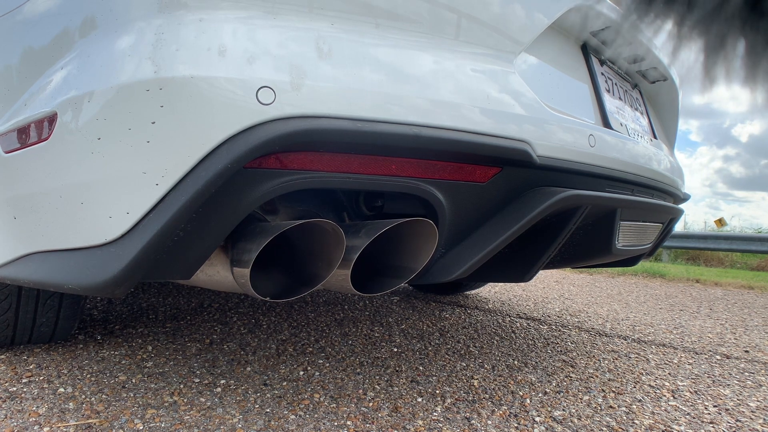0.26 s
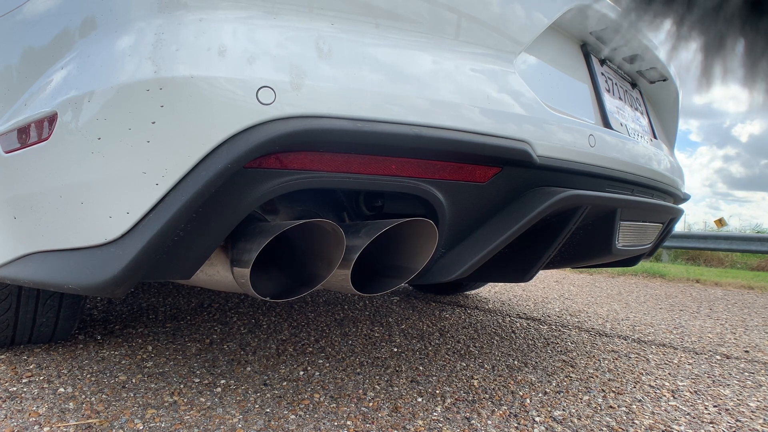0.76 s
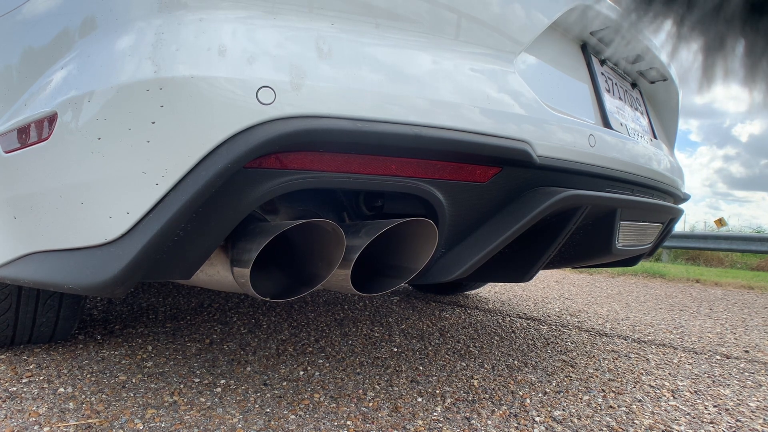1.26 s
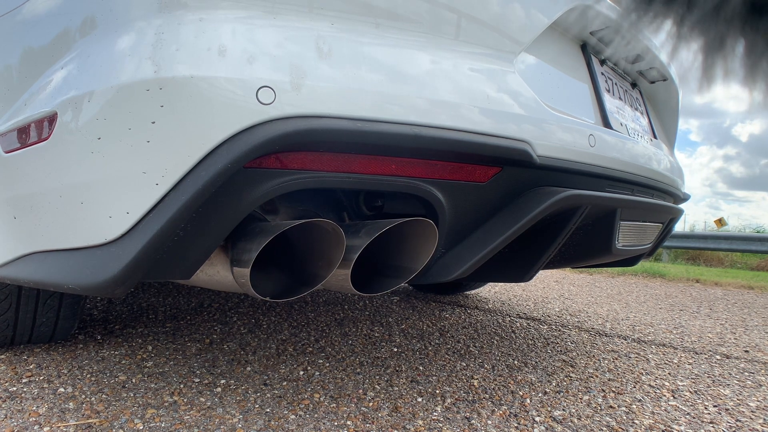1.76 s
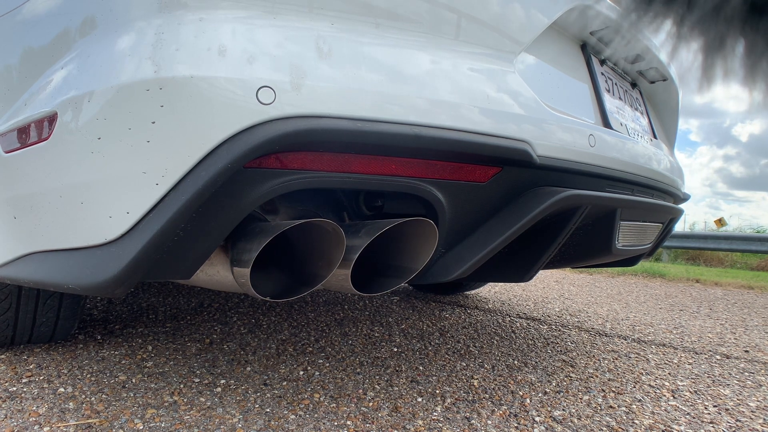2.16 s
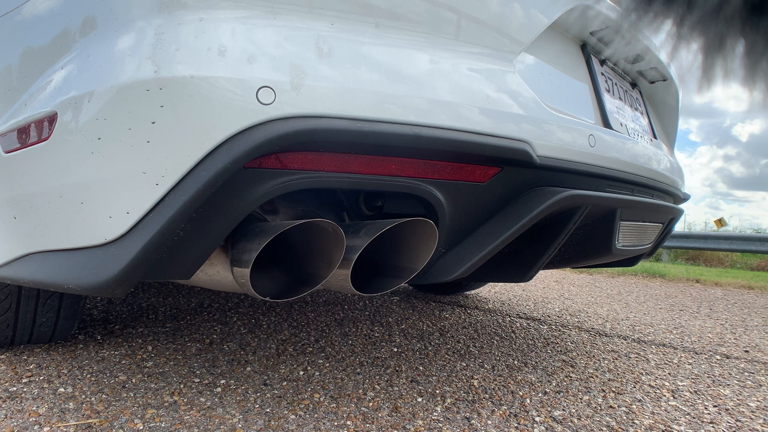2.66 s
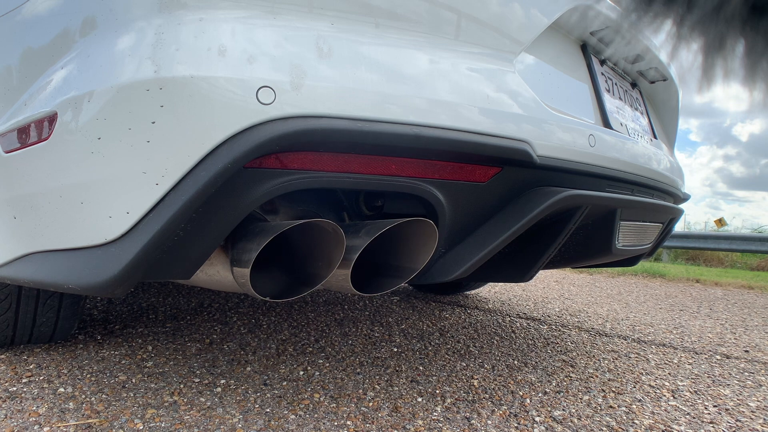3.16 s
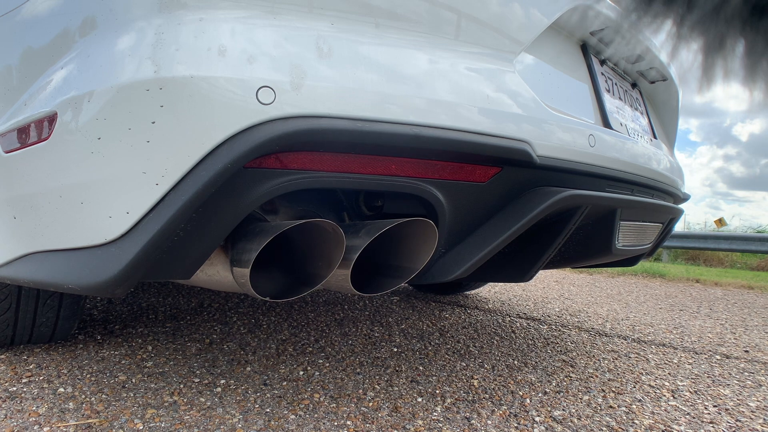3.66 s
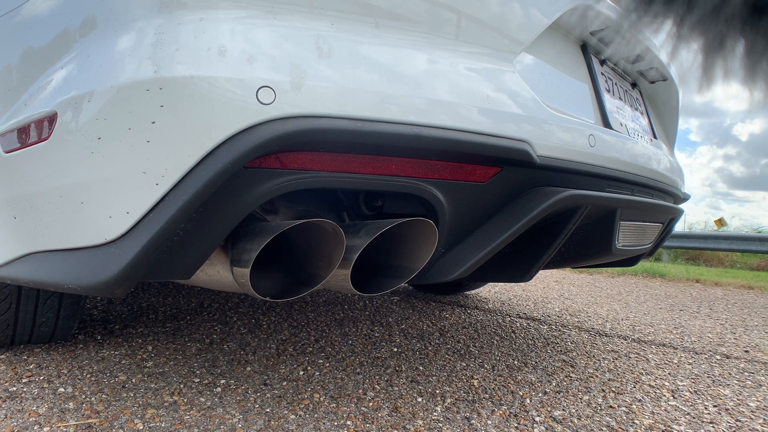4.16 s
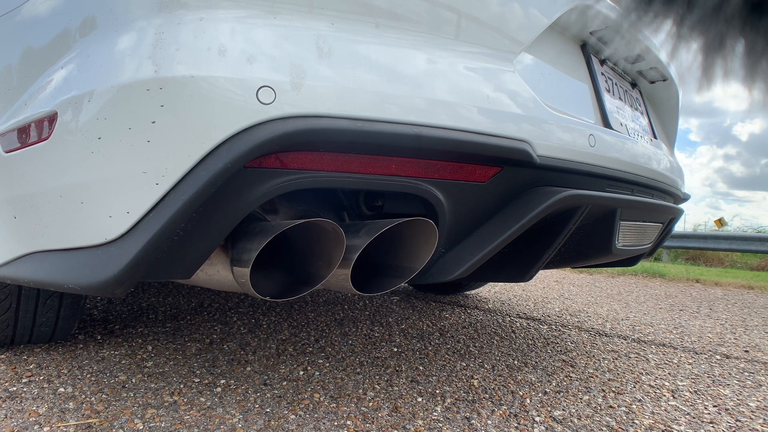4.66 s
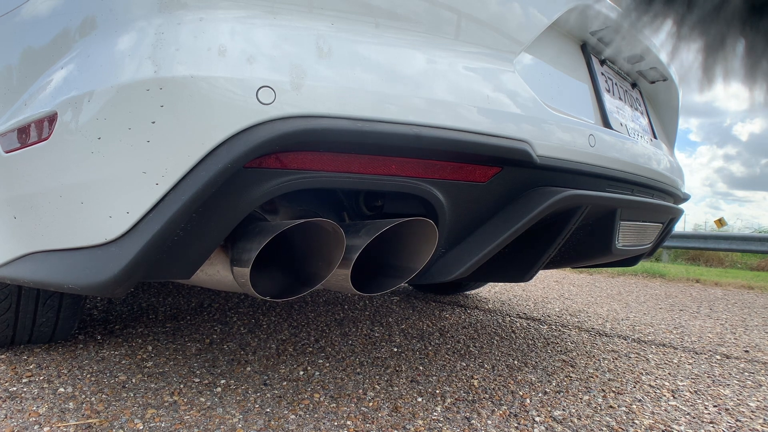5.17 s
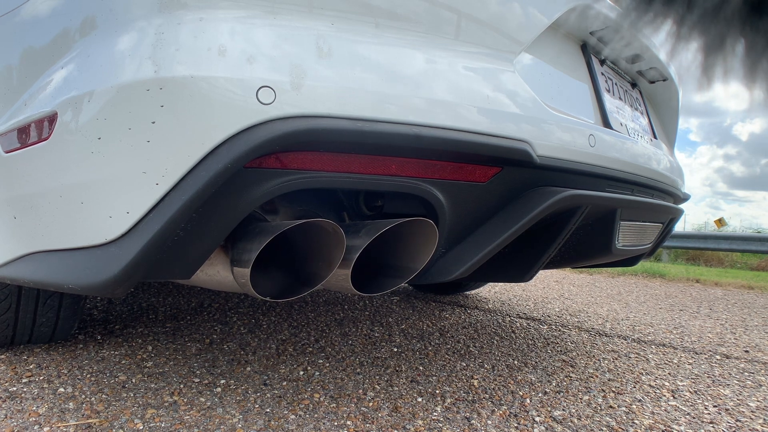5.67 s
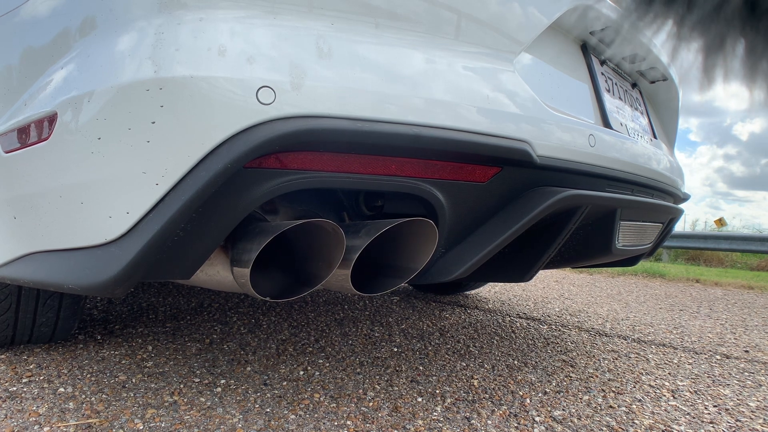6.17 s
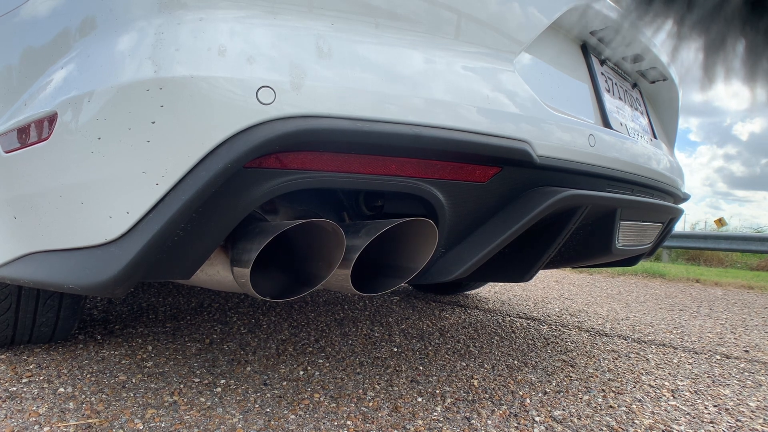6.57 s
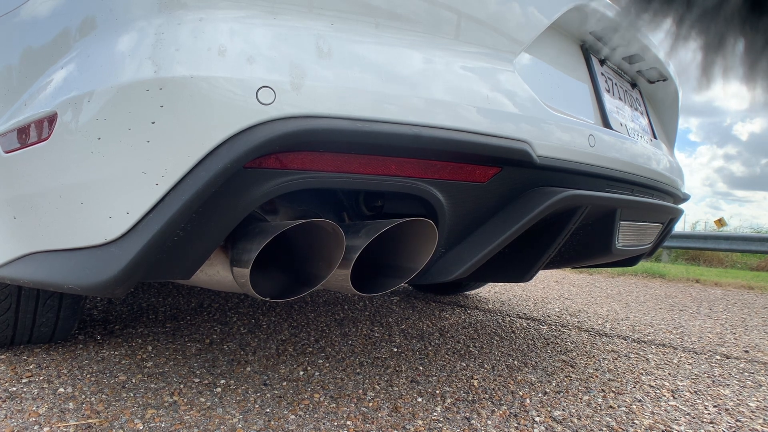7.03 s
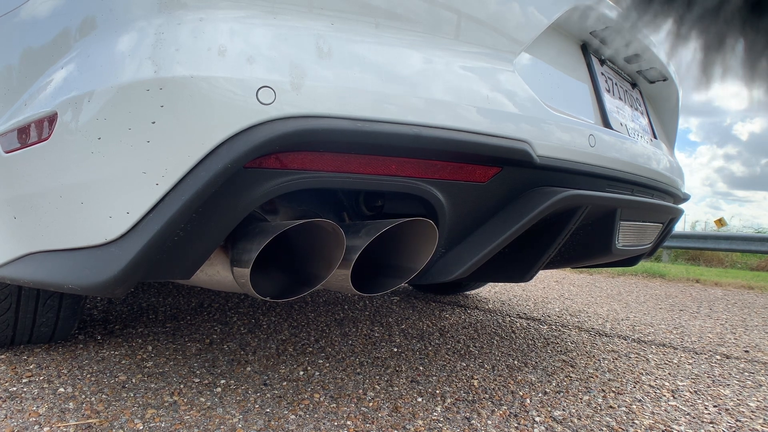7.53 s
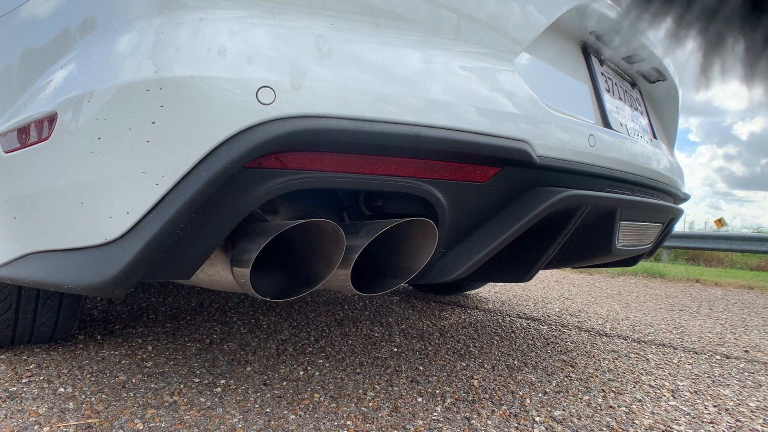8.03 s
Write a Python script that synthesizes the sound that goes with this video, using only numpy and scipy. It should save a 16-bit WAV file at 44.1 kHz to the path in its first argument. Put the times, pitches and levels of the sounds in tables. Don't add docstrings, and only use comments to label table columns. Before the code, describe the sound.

Close outdoor microphone at the exhaust of a parked V8. The deep, uneven burble slows and quietens to a throbbing idle with a faint thin whine from the engine. Two short revs burst in, hoarse and snarling, the second stronger. Then the throttle shuts, the note slides down with light ticking from a loose shield, and the idle settles amid low wind-like thumps.

```python
import sys
import numpy as np
from scipy import signal
from scipy.fft import rfft, irfft
from scipy.io import wavfile
from scipy.ndimage import uniform_filter1d

SR = 44100
rng = np.random.default_rng(int(sys.argv[2]) if len(sys.argv) > 2 else 0)


def dump(signal):
    limited = np.clip(np.atleast_2d(signal).T, -1, 1)
    pcm = np.round(limited * 32767).astype(np.int16)
    wavfile.write(sys.argv[1], SR, pcm)


def rack_gain(trim_db):
    fader = np.asarray(trim_db, float)
    return 10 ** (fader / 20)


N = 366030


def level(x, db=0):
    return x * rack_gain(db) / np.sqrt(np.mean(x ** 2))


def curves(rows):
    s, *columns = np.transpose(rows)
    return [np.interp(np.arange(N) / SR, s, c) for c in columns]


def ring(x, modes):
    total = 0
    for k, (hz, width, db) in enumerate(modes):
        b, a = signal.iirpeak(hz, hz / width, SR)
        total = total + (-1) ** k * rack_gain(db) * signal.lfilter(b, a, x)
    return total


def cut(x, hz, kind, order=2):
    return signal.sosfilt(signal.butter(order, hz, kind, fs=SR, output="sos"), x)


def flicker(rate):
    hold = int(SR / rate)
    steps = np.repeat(rng.standard_normal(N // hold + 1), hold)
    return uniform_filter1d(steps, hold)[:N]


# frequency in Hz, width in Hz, level in dB.
IDLE_PIPE = [(121.4, 15.1, 1.6), (192.1, 27.7, -2.5), (232.5, 61.2, -7.5), (337.5, 15.2, -8.5),
             (366, 39.6, -12), (430.6, 87, -17)]
# frequency in Hz, width in Hz, level in dB.
HOT_PIPE = [(137.5, 68.4, -3), (240.2, 28, -3.5)]
# frequency in Hz, width in Hz, level in dB.
OVERRUN_PIPE = [(122.5, 25.8, 2), (202.6, 41, -2.5), (234.5, 66, -9.5)]
# frequency in Hz, width in Hz, level in dB.
MUFFLER = [(42, 6.9, 0)]
# frequency in Hz, width in Hz, level in dB.
TIPS = [(636, 115, 10.5), (881, 124, 3.5), (941, 60, 9.5), (1437, 246, -4), (1682, 166, -3.5),
        (2420, 840, -14)]
# frequency in Hz, width in Hz, level in dB.
SHIELDS = [(2497, 130, 5), (3420, 600, -1.5), (4050, 400, -1.5), (6740, 1160, -8), (9870, 2100, -13),
           (13500, 3500, -16)]
# time in seconds, opening from 0 to 1.
THROTTLE = [(0, 0.02), (4.38, 0.05), (4.45, 0.43), (4.6, 0.66), (4.655, 1), (4.72, 0.75), (4.84, 0.34),
            (4.92, 0.2), (5.15, 0.47), (5.18, 0.65), (5.35, 0.99), (5.43, 0.56), (5.55, 0.14), (8.3, 0.16)]
# time in seconds, level in dB.
BLOW = [(0, -10.5), (.3, -15.5), (.5, -19), (1.3, -22.5), (2.3, -31), (4.1, -33.5), (4.24, -26.5),
        (4.4, -23), (4.47, -11.5), (4.84, -12.5), (5.13, -22), (5.165, -10.5), (5.42, -8.5), (5.5, -11.5),
        (5.66, -15), (6.25, -13.5), (6.8, -21.5), (8.3, -33)]


def exhaust(firing_hz):
    blow_db, load = curves(BLOW)[0], curves(THROTTLE)[0]
    boom_db, rasp_db, hiss_db = colour(firing_hz, load)
    burble_db = 0.7 * while_in("idle") * np.clip((firing_hz - 55) / 25, 0, 1)
    pulses = level(firings(firing_hz, 1.0 + 1.7 * load + burble_db))
    puffs = level(cut(pulses, 35, "low", order=1))
    gas = (2.4 + puffs * (0.4 + 3 * load)) * rng.standard_normal((3, N)) / (2.8 + 3 * load)

    hot = uniform_filter1d(1. * while_in("blip"), SR // 50)
    snarl_db = 5.85 * np.clip((firing_hz - 140) / 45, 0, 1) + 3.5 * hot
    boom_db = boom_db - 6.5 * hot

    spread = chambers(pulses, (2.3, 5.9, 11.3), 0.55)
    thuds = -cut(spread, 610, "low", order=3)
    low_modes = ring(thuds * while_in("idle"), IDLE_PIPE[:3])
    low_modes = low_modes + ring(thuds * while_in("blip"), HOT_PIPE)
    low_modes = low_modes + ring(thuds * while_in("overrun"), OVERRUN_PIPE)
    pipe = level(low_modes - rack_gain(snarl_db) * ring(thuds, IDLE_PIPE[3:]))
    swirl = level(cut(ring(gas[0], IDLE_PIPE), 170, "high"), -13)
    boom = -level(ring(thuds, MUFFLER))

    crack = 0.71 * load * pulses
    rasp = level(cut(ring(gas[1] + crack, TIPS), 244, "high"), -4 * load)
    hiss = cut(ring(gas[2] + 0.15 * crack, SHIELDS), 1600, "high")
    hiss = level(cut(hiss, 13000, "low"), -3 * load)
    hiss = hiss * rack_gain((0.8 + 1.2 * load) * flicker(60))
    bright = barks() * (rack_gain(rasp_db) * rasp + rack_gain(hiss_db) * hiss)
    return rack_gain(blow_db + 4.3 * load) * (pipe + swirl + rack_gain(boom_db) * boom + bright)


# time in seconds, speed in rpm.
SPEED = [(0, 2194), (1.1, 1155), (2.75, 790), (3.5, 705), (4.0, 710), (4.12, 785), (4.38, 1005),
         (4.61, 1960), (4.7, 2080), (4.87, 2156), (5.15, 1914), (5.34, 2880), (5.5, 3045), (5.68, 2880),
         (6.1, 2085), (6.4, 1573), (7.0, 1136), (8.3, 775)]


def crank_rpm():
    rest_rpm = 660
    s, rpm = np.transpose(SPEED)
    return rest_rpm + np.exp(np.interp(np.arange(N) / SR, s, np.log(rpm - rest_rpm)))


CYLINDERS = { "idle": [(6.5, .8), (-.4, 2.3), (4.1, 2.3), (4.7, 1.9), (.8, 2.4), (6.4, 0), (.7, 1.2),
             (2.6, 3)], "blip": [(8, 1), (-.2, 1.3), (9.8, 0), (2, 2.3), (-2.6, 4.2), (2.7, .1), (2.3, 2.9),
             (2.1, .9)], "overrun": [(1, .9), (2.3, 3.6), (.6, 0), (-.5, 3.4), (4.6, 3.6), (3.1, 0),
             (7.2, 3.5), (5.6, 1.8)]}


def firings(firing_hz, scatter_db):
    count = np.cumsum(firing_hz) / SR
    k = np.arange(1, int(count[-1]))
    chance = rng.standard_normal((2000, 2))[k].T
    place = np.interp(k, count, np.arange(N))
    patterns = np.array([CYLINDERS[name] for _, name in STATES])
    strength_db, delay_ms = patterns[state_at(place), k % 8].T
    spread_db = scatter_db[place.astype(int)]
    place = place + (delay_ms + 0.08 * spread_db * chance[0]) * SR / 1000
    place = np.clip(place, 0, N - 2)
    i = place.astype(int)
    size = rack_gain(strength_db + spread_db * chance[1]) / np.sqrt(firing_hz[i])
    pulses = np.zeros(N)
    np.add.at(pulses, i, size * (1 + i - place))
    np.add.at(pulses, i + 1, size * (place - i))
    return pulses


# start in seconds, name of the state.
STATES = [
    (0, "overrun"),
    (.32, "idle"),
    (4.53, "blip"),
    (5.66, "overrun"),
    (6.48, "idle"),
]


def state_at(sample):
    return np.searchsorted([s * SR for s, _ in STATES], sample, side="right") - 1


def while_in(state):
    return np.array([name == state for _, name in STATES])[state_at(np.arange(N))]


def chambers(x, delays_ms, gain):
    turn = -2j * np.pi * np.arange(N // 2 + 1) * SR / N / 1000
    spectrum = rfft(x)
    for ms in delays_ms:
        echo = np.exp(turn * ms)
        spectrum = spectrum * (echo - gain) / (1 - gain * echo)
    return irfft(spectrum, N)


# speed in rpm, then boom, rasp and hiss in dB relative to the blow.
COLOUR = [(686, -2, -20, -31), (920, -0.5, -23, -37), (1200, -5.5, -22.5, -41), (1480, -7.5, -23, -37.5),
          (2050, -7.5, -20.5, -39), (3060, -7.5, -15.5, -35)]


def colour(firing_hz, load):
    full_throttle_db = (-11, 12.5, 12.5)
    rpm, *columns = np.transpose(COLOUR)
    return [np.interp(firing_hz * 60 / 4, rpm, c) + db * load ** 1.4
            for c, db in zip(columns, full_throttle_db)]


# start in seconds, boost in dB.
BARKS = [(4.429, 10), (4.456, 8.5), (4.493, 6), (4.571, 6), (4.634, 6.5), (4.652, 5.5), (4.694, 5),
         (4.806, 11), (5.174, 7.5), (5.216, 5.5), (5.268, 8.5), (5.34, 4), (5.358, 5.5), (5.38, 5),
         (5.398, 8.5)]


def barks():
    decay_s = 0.0067
    t = np.arange(N) / SR
    gain = 1
    for s, db in BARKS:
        gain = gain + (rack_gain(db) - 1) * (t >= s) * np.exp(-np.maximum(t - s, 0) / decay_s)
    return gain


# multiple of the pole rate, level in dB, firing rate in Hz above which it fades.
WHINE = [(2, -62, 125), (3, -61, 88), (4, -68, 104), (5, -73, 66), (6, -77, 60), (7, -65, 49)]
# frequency in Hz, width in Hz, level in dB.
ENGINE_BAY = [(2050, 500, -5), (3600, 450, -1), (4100, 650, 1), (6350, 900, 4)]


def alternator(firing_hz):
    poles_per_firing = 18.3
    turn = 2 * np.pi * np.cumsum(poles_per_firing * firing_hz) / SR
    tones = 0
    for m, db, top_hz in WHINE:
        strength = rack_gain(db + 5.1 * flicker(30))
        tone = np.sin(m * turn + 1.27 * flicker(120))
        tones = tones + strength * tone / (1 + (firing_hz / top_hz) ** 16)
    charge = (firing_hz / 50) ** 0.9
    return sum(ring(ring(tones * charge, [(hz, width, db)]), [(hz, width, 0)])
               for hz, width, db in ENGINE_BAY)


# start in seconds, peak level in dB.
TICKS = [(0.1865, -40), (0.2279, -43), (0.2503, -41), (5.6795, -44), (6.103, -43), (6.1619, -41),
         (6.2253, -37), (6.2911, -37), (6.337, -38), (6.3644, -37), (6.4398, -38.5), (7.4245, -56)]


def shield_ticks():
    decay_s = 0.0085
    hits = np.zeros(N)
    for s, db in TICKS:
        hits[int(s * SR)] = rack_gain(db)
    burst = signal.lfilter([1], [1, -np.exp(-1 / (decay_s * SR))], hits)
    return 0.93 * cut(burst * rng.standard_normal(N), 8900, "high")


# centre in seconds, peak level in dB, half length in seconds.
GUSTS = [(.35, -37, 0.077), (0.74, -16, 0.27), (2.3, -34, 0.67), (4.915, -18, 0.36), (5.5, -38, 0.11),
         (6.1, -44, 0.58), (6.88, -15, 0.23), (7.272, -19.5, 0.1), (7.634, -14, .14), (8.044, -16, 0.2)]


def gusts():
    t = np.arange(N) / SR
    calm_db = -51.5
    return rack_gain(calm_db) + sum(rack_gain(db) * np.exp(-((t - s) / half) ** 2) for s, db, half in GUSTS)


def draught():
    sway = cut(rng.standard_normal(N), 5.0, "low")
    return gusts() * level(cut(sway, 2.75, "high"))


# frequency in Hz, level in dB per Hz.
OUTDOORS = [(700, -35), (942, 29.5), (1110, -35), (3000, -7), (8600, -28), (10000, 1.5), (11300, -30),
            (22000, -120)]


def outdoors():
    hz, db = np.transpose(OUTDOORS)
    f = np.maximum(np.arange(N // 2 + 1) * SR / N, 1)
    shape = rack_gain(np.interp(np.log(f), np.log(hz), db))
    return level(irfft(rfft(rng.standard_normal(N)) * shape, N), -60)


def scene():
    firing_hz = crank_rpm() * 4 / 60
    engine = exhaust(firing_hz) + alternator(firing_hz) + shield_ticks()
    return (engine + outdoors() + draught())[None]


def low_pass(x):
    return signal.sosfilt(signal.butter(12, 15780, fs=SR, output="sos"), x)


def record(dry):
    ceiling, knee = 0.48, 7.0
    flat = dry / (1 + np.abs(dry / ceiling) ** knee) ** (1 / knee)
    flat = cut(flat, 12700, "low", order=1)
    flat = cut(flat, 15750, "low", order=24)
    return low_pass(flat)


dry = scene()
out = record(dry)
dump(out)
```